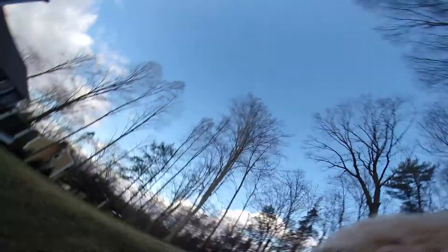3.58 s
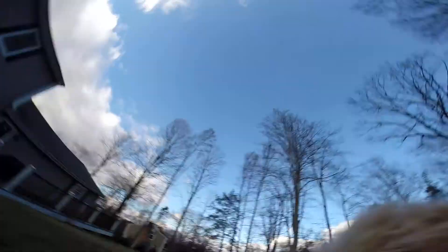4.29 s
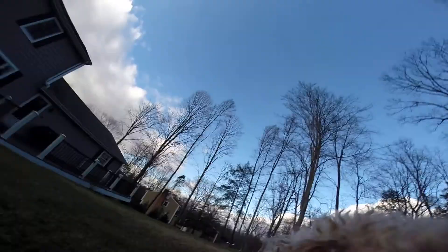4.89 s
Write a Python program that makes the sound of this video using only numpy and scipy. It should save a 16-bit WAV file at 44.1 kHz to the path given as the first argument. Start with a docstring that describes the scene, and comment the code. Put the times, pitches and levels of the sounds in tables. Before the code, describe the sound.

An animal runs across a lawn with the microphone riding on its harness. Fur and straps brush right against the plastic housing, and the stride brings low thumps and a deep rumble of air. A fitting gives a few separate sharp knocks, then breaks into a fast, loud, slightly distorted rattle. Afterwards the movement eases to soft rubbing. A thin hiss lies far behind.

```python
"""On a lawn, an animal runs with a camera riding on its harness.
A harness fitting knocks on the plastic housing, at one point in a fast rattle that overloads
the recorder. Fur and straps rub on the housing, and the stride heaves the air at the microphone.
The mount creaks once. Far behind it all are a thin hiss and a few very faint high peeps."""
import sys
import numpy as np
from scipy import signal
from scipy.fft import rfft, irfft
from scipy.io import wavfile
from scipy.ndimage import uniform_filter1d

SR = 44100
rng = np.random.default_rng(int(sys.argv[2]) if len(sys.argv) > 2 else 0)


def generate_wav(signal):
    """Clip the signal to [-1, 1] and save it as 16-bit WAV at the path in sys.argv[1]."""
    frames = np.transpose(np.atleast_2d(signal))
    scaled = np.clip(frames, -1, 1) * 32767
    pcm = np.round(scaled).astype(np.int16)
    wavfile.write(sys.argv[1], SR, pcm)


N = 287973
TIME = np.arange(N) / SR


def gain_of(db):
    """Turns decibels into a number to multiply a sound by."""
    return 10 ** (np.asarray(db) / 20)

def evened(x):
    """Scales a signal to an average (rms) level of 1."""
    return x / np.sqrt(np.mean(x ** 2) + 1e-20)

def add(mix, start_s, sound):
    """Mixes a sound in at the given time."""
    part = mix[max(round(start_s * SR), 0):][:len(sound)]
    part += sound[:len(part)]

def coloured(x, spectrum):
    """Shapes the bass and treble of x with rows of Hz and dB, then evens its level to 1."""
    hz, db = np.transpose(spectrum)
    curve = np.interp(np.log(np.fft.rfftfreq(N, 1 / SR) + 1), np.log(hz), db)
    return evened(irfft(rfft(x) * gain_of(curve), N))

def wander(per_s):
    """A smooth random curve that wiggles up to about per_s times a second."""
    hz = np.fft.rfftfreq(N, 1 / SR)
    return evened(irfft(rfft(rng.standard_normal(N)) * np.exp(-(hz / per_s) ** 2), N))

def ringing(tones, t, detune=0):
    """A struck part rings with tones that each drop 60 dB in their fade time; detune varies the pitch."""
    sound = np.zeros(len(t))
    for k, (hz, db, fade_s) in enumerate(tones):
        pitch = hz * (1 + detune * rng.standard_normal())
        sound += (-1) ** k * gain_of(db - 60 * t / fade_s) * np.sin(2 * np.pi * pitch * t)
    return sound / abs(sound).max()

def softened(x, cutoff_hz):
    """A contact that is not perfectly hard loses its treble."""
    return signal.lfilter(*signal.butter(2, cutoff_hz, fs=SR), x)


# The tones of the camera's mount, its hollow body, its walls, and the one tone that lingers.
# Each row: pitch in Hz, relative level in dB, fade time in seconds.
MOUNT_TONES = [(167, -3, 0.027), (243, 5.5, 0.011), (327, 0.5, 0.014)]
HOLLOW_TONES = [(740, 0, .010), (900, -6, .006)]
WALL_TONES = [(1290, -5, .008), (1540, -2, .009), (2090, 0, .011), (2610, -3, .009)]
LASTING_TONE = (1825, 0, 0.12)
# The tones of its stiff edges. Each row: pitch in Hz, relative level in dB.
EDGE_TONES = [(3100, 4.5), (4060, 10.5), (4520, 4), (5500, 1.5), (6200, 2), (8000, -22.5), (10000, -35.5)]
# The noise at the instant of contact. Each row: frequency in Hz, relative level in dB.
CRACK_SPECTRUM = [(300, -3.5), (800, 2), (2200, 7.5), (3400, -15), (4200, -6.5), (7000, -23.5),
                  (11000, -49), (16000, -66.5)]
# Blows on the housing. Each row: start in seconds, force in dB, weight in dB (how much of the
# blow goes into the mount).
BLOWS = [(0.88, -12.5, -4.5), (1.7055, -15, -7), (3.0096, -21.5, -13), (3.1629, -30, -0.5),
         (3.587, -8.5, -11.5), (3.7164, -25, -13), (3.7216, -4, -25.5), (4.29, -7.5, -1),
         (4.2928, -5.5, -11), (4.331, -18.5, -1), (4.347, -6.5, -9.5), (4.4335, -7, -4.5),
         (4.507, -2.5, -7), (4.5707, -10.5, -3), (4.639, -2.5, -10.5), (4.685, -29.5, -1),
         (4.711, -21.5, 4.5), (4.7152, -20, 5), (4.7194, -11.5, -3), (4.8221, -6, -6), (4.8565, -20, 0),
         (4.8864, -6, -4.5), (4.9374, -19, 3.5), (4.9768, -19, 1.5), (5.135, -26, -8), (5.9675, -34, -6),
         (6.2979, -34, -10), (6.508, -33, 4)]

def knocks(crack_s=0.0037, edge_fade_s=.0055, detune=.02):
    """The fitting hits with a dry crack, chatters for an instant, and rings the mount and housing."""
    out, crack = np.zeros((2, N))
    t = np.arange(SR // 6) / SR
    edge_tones = [(hz, db, edge_fade_s) for hz, db in EDGE_TONES]
    crack_shape = (1 - np.exp(-(t / .0003) ** 2)) * np.exp(-(t / crack_s) ** 2)
    for start, force, weight in BLOWS:
        chatter = .05 * rng.standard_normal(len(t)) * np.exp(-t / .0018)
        chatter[0] = 1  # the first hit
        bite_db = 0.33 * weight  # a glancing blow has less crack and edge
        # Each blow lands on a slightly different spot, so the tones are detuned.
        # Force times more than 1: that part gains more from a hard blow than the walls do.
        thud = gain_of(force + weight + 3.5) * ringing(MOUNT_TONES, t, detune)
        hollow = gain_of(1.15 * force + weight + 7) * ringing(HOLLOW_TONES, t, detune)
        clack = gain_of(force + 7) * ringing(WALL_TONES, t, detune)
        edge = gain_of(1.27 * force + bite_db + 4.5) * ringing(edge_tones, t, detune)
        add(out, start, signal.fftconvolve(chatter, clack + edge - thud - hollow)[:len(t)])
        ring_db = 1.3 * force - .25 * weight - 21  # leaning on the mount quiets the lasting tone
        add(out, start, gain_of(ring_db) * ringing([LASTING_TONE], t))
        add(crack, start, gain_of(force + bite_db + 3) * crack_shape)
    return softened(out, cutoff_hz=7500) + crack * coloured(rng.standard_normal(N), CRACK_SPECTRUM)


# Rubbing as heard through the housing (lower part, then treble), and the rumble of the straps.
# Each row: frequency in Hz, relative level in dB.
RUB_SPECTRUM = [(200, -17.5), (500, -7.5), (760, -7.5), (1050, -7.5), (1350, -5.5), (1570, 1), (1850, -5),
                (2150, -2), (2450, -6), (2720, -4), (3100, -14), (3550, -25.5)]
RUB_TREBLE_SPECTRUM = [(4100, -12), (4600, -14.5), (5000, -29.5), (5550, -12.5), (5900, -24.5),
                       (6350, -18.5), (6900, -42), (8100, -41), (9100, -56.5), (10300, -42.5),
                       (16000, -73.5)]
STRAP_SPECTRUM = [(30, -25), (70, 2), (120, 1.5), (180, 3), (250, -9), (350, -9.5), (480, -19),
                  (750, -23.5), (1300, -46.5), (3000, -56.5), (9000, -110)]

def friction(hiss, rumble):
    """Many tiny slips: their hiss passes through the housing walls, their drag shakes the straps."""
    grip = gain_of(1.8 * wander(45))
    slips = rng.standard_normal(N) * gain_of(3 * wander(700)) * grip
    drag = rng.standard_normal(N) * grip
    rubbing = coloured(slips, RUB_SPECTRUM + RUB_TREBLE_SPECTRUM)
    return hiss * rubbing + rumble * coloured(drag, STRAP_SPECTRUM)

def catches(drag, per_s=40):
    """A strap edge catches at random moments: dull little taps within the rubbing."""
    size_db = 3 * np.minimum(rng.exponential(1, N), 3)
    snags = gain_of(size_db) * (rng.random(N) < per_s / SR)
    tap = ringing([(192, -0.5, 0.027), (383, -2.5, .012), (825, -4.5, 0.0055)], np.arange(SR // 20) / SR)
    taps = signal.oaconvolve(softened(snags, cutoff_hz=3000), tap)[:N]
    return evened(taps) * drag * gain_of(-8)


# How firmly the coat rests on the housing between strokes.
# Each row: time in seconds, relative hiss level in dB, relative rumble level in dB.
RESTING_PRESSURE = [(0, -74, -64), (.22, -72, -62.5), (.41, -55, -49), (.55, -57.5, -53.5), (.72, -48, -44),
                    (1.2, -46.5, -40.5), (1.32, -50.5, -45.5), (1.8, -47.5, -42.5), (2.1, -50, -44.5),
                    (3.35, -48.5, -46), (3.6, -45, -43.5), (3.91, -59.5, -60), (4.22, -43, -39),
                    (4.4, -57, -46), (4.78, -48, -47), (5.331, -65.5, -61), (5.54, -54.5, -50),
                    (6.53, -51.5, -49)]
# Strokes of the coat across the housing. Each row: time of the peak in seconds, hiss level in dB,
# relative rumble level in dB, length in seconds.
FUR_STROKES = [(0.33, -55, -44.5, 0.067), (0.448, -51.5, -42, 0.054), (0.675, -39.5, -39, 0.096),
               (1.08, -42, -37, 0.04), (1.144, -36, -39.5, 0.067), (1.469, -40.5, -28.5, .05),
               (1.528, -41, -36.5, 0.054), (1.887, -37, -36, 0.097), (1.976, -40, -33.5, 0.059),
               (2.152, -37.5, -31.5, 0.035), (2.275, -34.5, -31, 0.033), (2.346, -39, -35.5, 0.061),
               (2.525, -39.5, -32, 0.039), (2.642, -36.5, -36.5, 0.073), (2.774, -35, -23.5, .035),
               (3.026, -37.5, -39, 0.069), (3.157, -34, -30, 0.047), (3.406, -31, -31, 0.04),
               (3.643, -29, -22.5, 0.031), (3.702, -32, -25, 0.021), (3.81, -38, -29.5, 0.038),
               (3.889, -40, -29.5, 0.036), (3.975, -39, -26.5, 0.051), (4.051, -37, -27, 0.044),
               (4.132, -32, -22, 0.048), (4.217, -28.5, -21.5, 0.042), (4.497, -31, -28, 0.016),
               (4.876, -44, -28, .025), (5.139, -38, -34, .025), (5.972, -42, -33.5, 0.058),
               (6.134, -47.5, -35.5, 0.088), (6.329, -40.5, -44, .05), (6.522, -37, -25, .05)]

def fur(swell_share=0.63):
    """The coat brushes the housing all the time, harder with each stroke, and drags the straps along."""
    times, rest_hiss_db, rest_rumble_db = np.transpose(RESTING_PRESSURE)
    drift = wander(per_s=21)
    hiss_power = gain_of(np.interp(TIME, times, rest_hiss_db) + 2.5 + 1.35 * drift) ** 2
    rumble_power = gain_of(np.interp(TIME, times, rest_rumble_db) + 1 + 2.5 * drift) ** 2
    for peak, hiss_db, rumble_db, length in FUR_STROKES:
        width = length * np.where(TIME < peak, swell_share, 1 - swell_share)  # slow swell, quicker fade
        swell = np.exp(-((TIME - peak) / width) ** 2)
        hiss_power += (gain_of(hiss_db) * swell) ** 2
        rumble_power += (gain_of(rumble_db) * swell) ** 2
    hiss, rumble = np.sqrt(hiss_power), np.sqrt(rumble_power)
    return friction(hiss, rumble * gain_of(1)) + catches(rumble)


# Short slips of a strap. Each row: start in seconds, relative hiss level in dB, relative rumble
# level in dB, rough length in seconds.
STRAP_SLIPS = [(0.906, -35, -47, 0.0065), (2.227, -28, -28.5, 0.019), (2.74, -32.5, -20, 0.0069),
               (3.005, -27.5, -33, 0.014), (3.546, -23.5, -15, 0.036), (3.782, -36, -22.5, 0.0072),
               (4.254, -22.5, -16.5, 0.015), (4.394, -38, -35, 0.023), (4.629, -18, -18, 0.0067),
               (4.753, -31.5, -29, 0.012), (5.027, -41.5, -24, 0.015), (5.068, -34, -49, 0.01),
               (5.231, -47.5, -33.5, 0.012), (5.409, -48, -39.5, 0.011), (6.329, -35.5, -32, 0.0088)]

def scuffs(gain_db=-2, rise_share=0.47):
    """A strap lets go quickly and slides to rest."""
    hiss, rumble = np.zeros((2, N))
    t = np.arange(SR // 5) / SR
    for start, hiss_db, rumble_db, length in STRAP_SLIPS:
        progress = t / (rise_share * length)
        slide = progress * np.exp(1 - progress)  # loudest when progress reaches 1
        add(hiss, start, gain_of(hiss_db + gain_db) * slide)
        add(rumble, start, gain_of(rumble_db + gain_db) * slide)
    return friction(hiss, rumble)


# Heavy jolts of the stride. Each row: time of the peak in seconds, peak level in dB, swing rate in Hz.
FOOTFALLS = [(0.545, -19.5, 16), (0.89, -16, 30), (1.183, -14.5, 26), (1.362, -18, 22), (1.498, -8, 26),
             (1.72, -12, 20), (2.297, -9.5, 27), (2.452, -11.5, 20), (2.635, -14.5, 28.6),
             (2.847, -4.5, 20.6), (3.233, -13, 25.4), (4.09, -17, 43), (4.208, -13.5, 30),
             (4.627, -14.5, 62), (4.728, -11.5, 33.5), (4.831, -12, 35), (4.943, -9.5, 42),
             (5.049, -12.5, 24), (5.149, -9.5, 30), (5.258, -22, 20)]

def jolts():
    """A footfall presses on the camera: one dent in the pressure, with a soft rebound on either side."""
    out = np.zeros(N)
    for peak, db, hz in FOOTFALLS:
        offset = np.sqrt(2) * np.pi * hz * (TIME - peak)
        out -= gain_of(db) * (1 - offset ** 2) * np.exp(-offset ** 2 / 2)
    return out


# The deep rumble of the heaving air. Each row: frequency in Hz, relative level in dB.
HEAVE_SPECTRUM = [(5, -3), (16, -6), (28, -1.5), (45, -14.5), (70, -19.5), (120, -31), (300, -54.5),
                  (3000, -140)]
# How strongly the camera rocks. Each row: time in seconds, relative level in dB.
ROCKING = [(0.0, -49), (0.44, -27), (2.93, -20.5), (3.71, -24), (5.15, -25.5), (5.44, -38), (6.44, -15),
           (6.53, -24)]

def heave(gain_db=-3.5):
    """The air pressure swings slowly as the camera rocks against the animal."""
    swing = coloured(rng.standard_normal(N), HEAVE_SPECTRUM)
    swing /= np.sqrt(uniform_filter1d(swing ** 2, size=7000) + 0.027)  # keeps the swings alike in size
    return swing * gain_of(np.interp(TIME, *np.transpose(ROCKING)) + gain_db)


def creak(start_s=1.517, peak_db=-21, decay_s=0.0037):
    """The mount slips and gives one small, dull creak."""
    out, t = np.zeros(N), np.arange(SR // 20) / SR
    slips = rng.standard_normal(len(t)) * np.exp(-t / decay_s)
    sound = signal.fftconvolve(slips, ringing([(830, 0, .012), (1100, 0, .012)], t))
    add(out, start_s, gain_of(peak_db) * sound / abs(sound).max())
    return out


# The tone of the background hiss. Each row: frequency in Hz, relative level in dB.
AIR_SPECTRUM = [(200, 10), (570, 8.5), (2400, 3.5), (4700, 1.5), (8000, -3), (9200, -10), (10300, -4),
                (11800, -13), (13000, -13.5), (14500, -9.5), (16000, -25.5)]
# How loud that hiss is. Each row: time in seconds, level in dB.
AIR_LEVELS = [(0, -64), (3.55, -61.5), (3.75, -69), (4.25, -74), (4.35, -86), (5.2, -77), (6.53, -60.5)]

def air():
    """A thin hiss under everything; it sinks during the rattle and comes back slowly."""
    level_db = np.interp(TIME, *np.transpose(AIR_LEVELS))
    return coloured(rng.standard_normal(N), AIR_SPECTRUM) * gain_of(level_db)


# Very faint high peeps. Each number: start in seconds.
PEEP_STARTS = [.54, 1.50, 1.60, 1.80, 2.60, 2.96]

def peeps(peak_db=-66, hz=7550, length_s=.07):
    """Thin, wavering whistles, barely above the hiss."""
    swells = np.zeros(N)
    for start in PEEP_STARTS:
        add(swells, start, np.hanning(round(length_s * SR)))
    pitch = hz * (1 + .012 * wander(120))
    return gain_of(peak_db) * swells * np.sin(2 * np.pi * np.cumsum(pitch) / SR)


def scene():
    """All the sounds add up at the camera's one microphone."""
    return (air() + fur() + scuffs() + heave() + jolts() + knocks() + creak() + peeps())[None]

def record(dry, cutoff_hz=15700):
    """The recorder overloads, flattening the hardest knocks, and cuts off the highest treble."""
    clipped = dry / (1 + dry ** 4) ** (1 / 4)
    treble_cut = signal.firwin(127, cutoff_hz, window=("kaiser", 8), fs=SR)
    return signal.oaconvolve(clipped, treble_cut[None], "same")


dry = scene()
out = record(dry)
generate_wav(out)
```